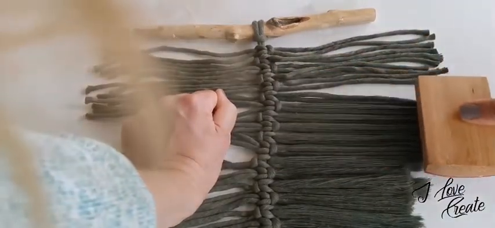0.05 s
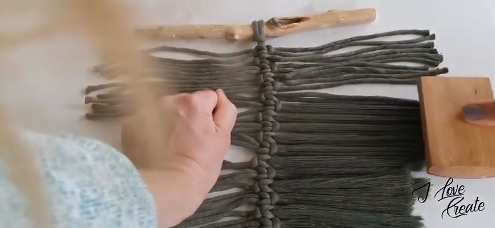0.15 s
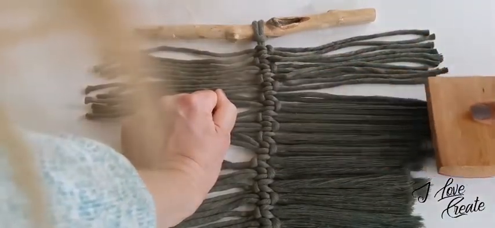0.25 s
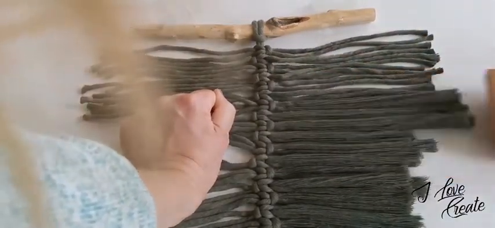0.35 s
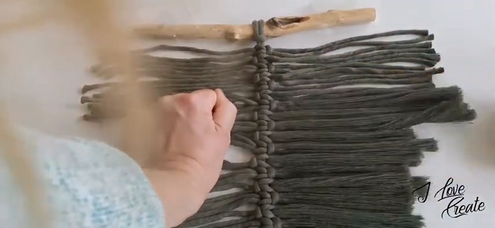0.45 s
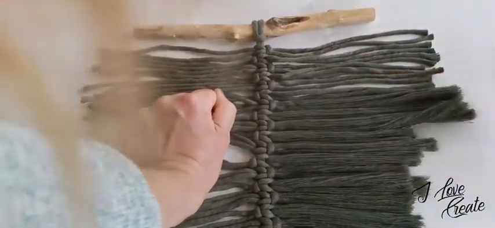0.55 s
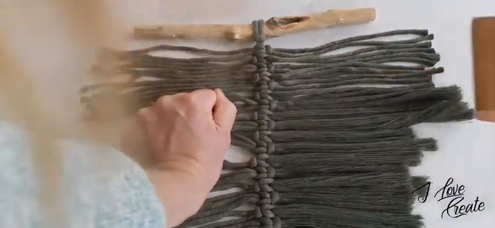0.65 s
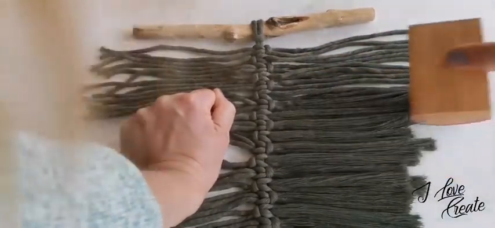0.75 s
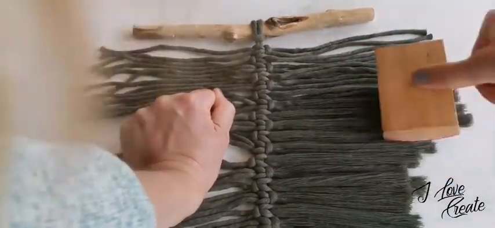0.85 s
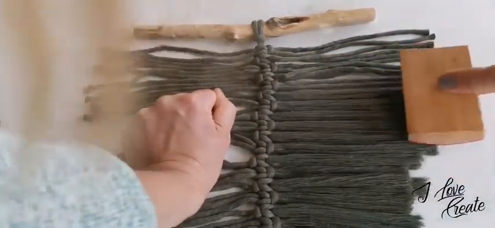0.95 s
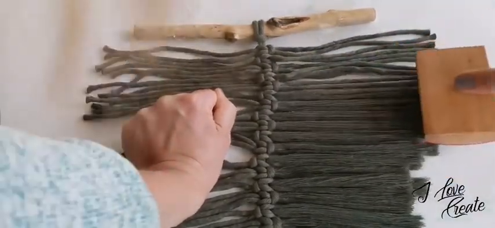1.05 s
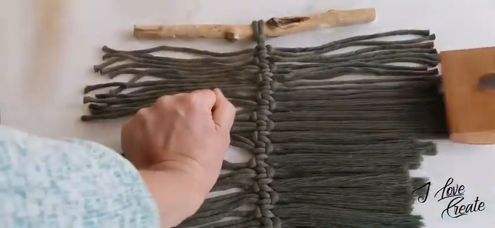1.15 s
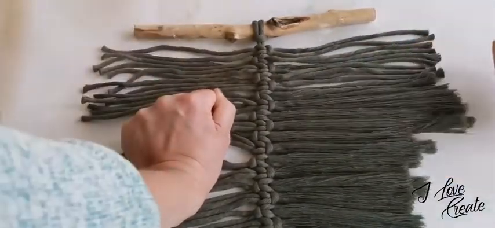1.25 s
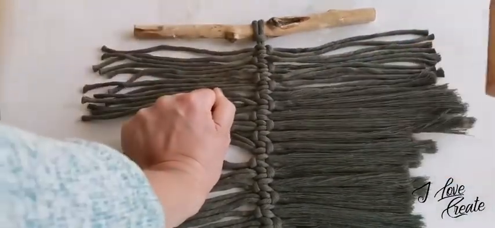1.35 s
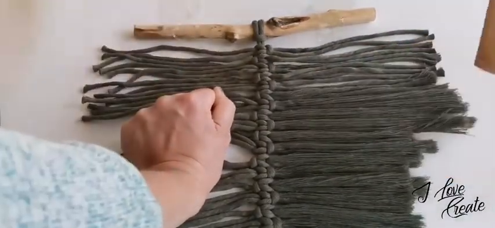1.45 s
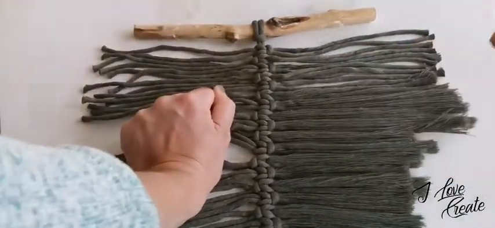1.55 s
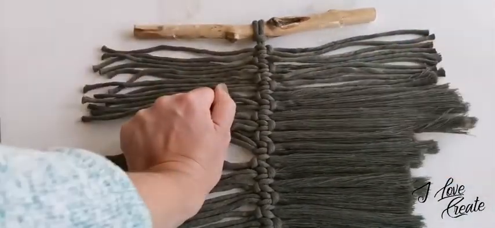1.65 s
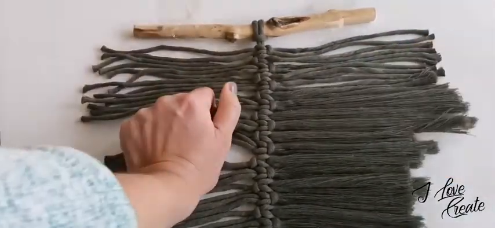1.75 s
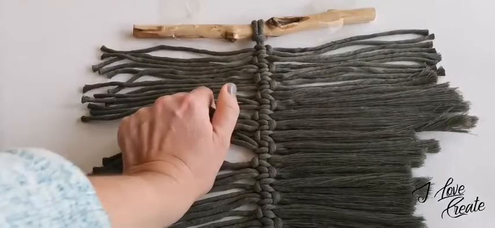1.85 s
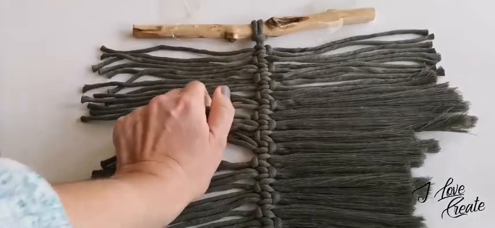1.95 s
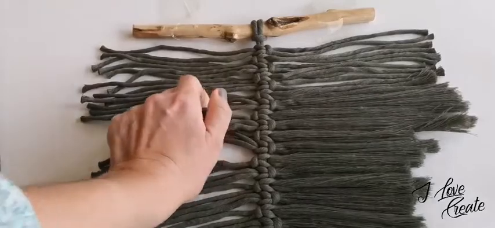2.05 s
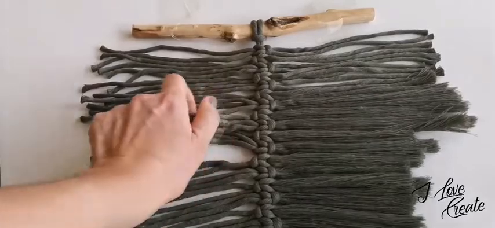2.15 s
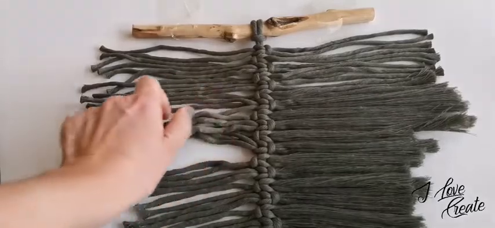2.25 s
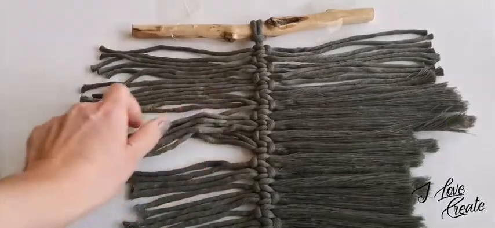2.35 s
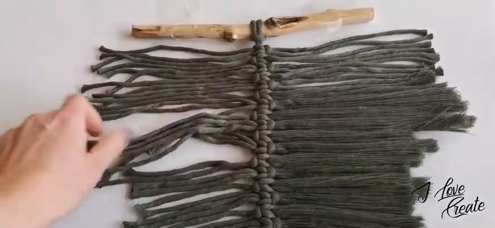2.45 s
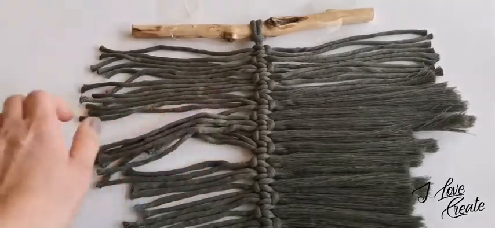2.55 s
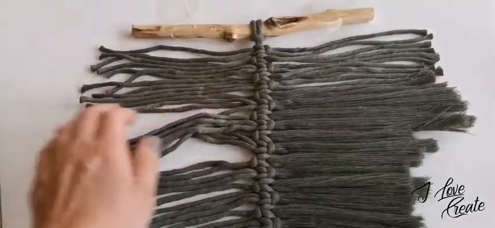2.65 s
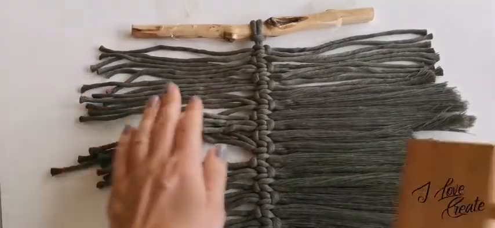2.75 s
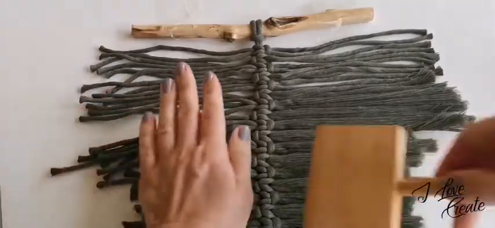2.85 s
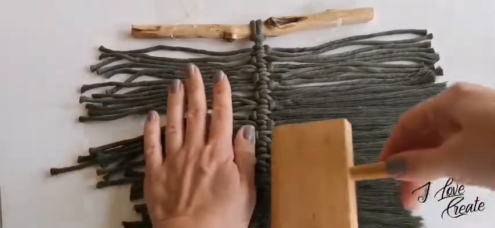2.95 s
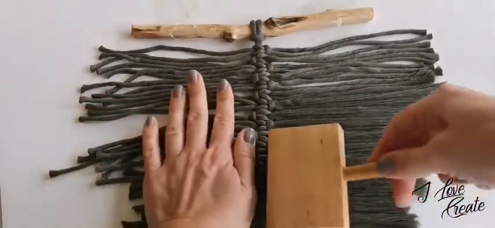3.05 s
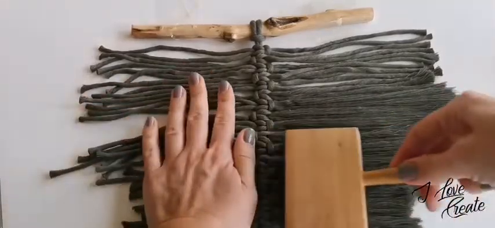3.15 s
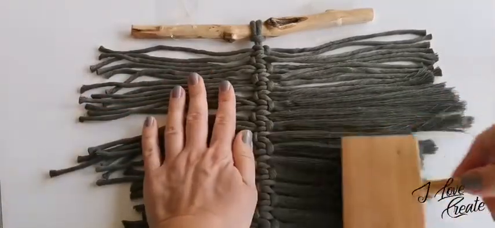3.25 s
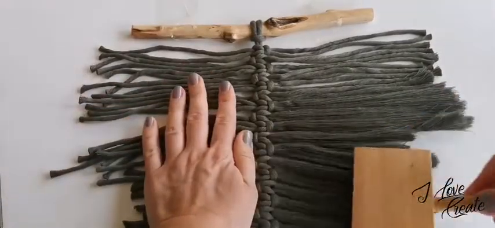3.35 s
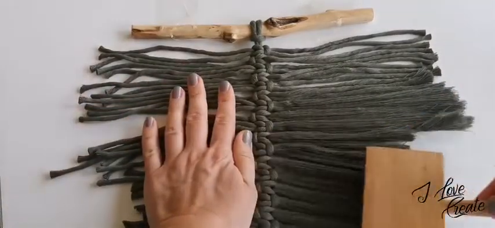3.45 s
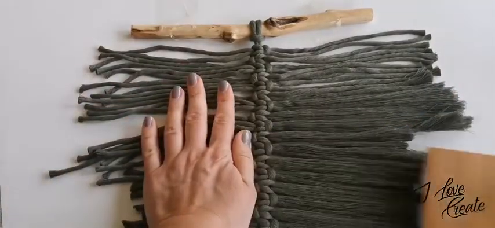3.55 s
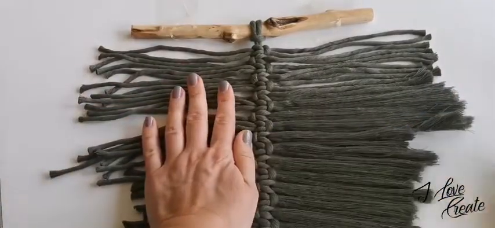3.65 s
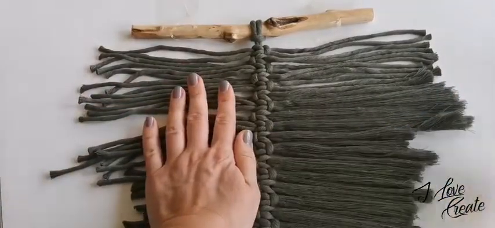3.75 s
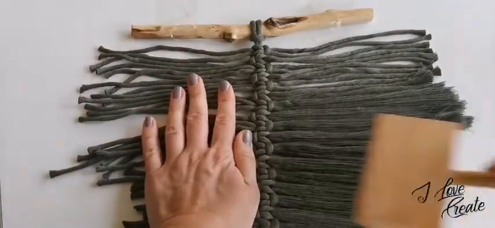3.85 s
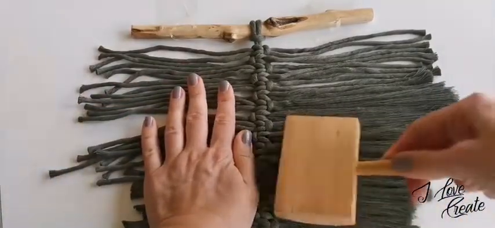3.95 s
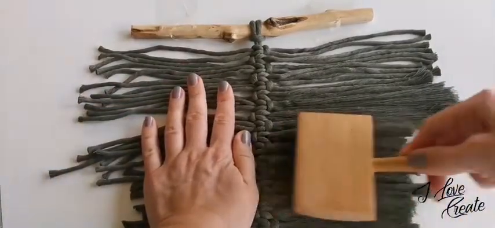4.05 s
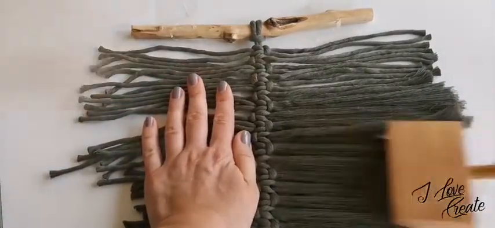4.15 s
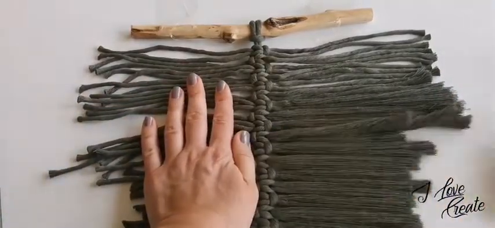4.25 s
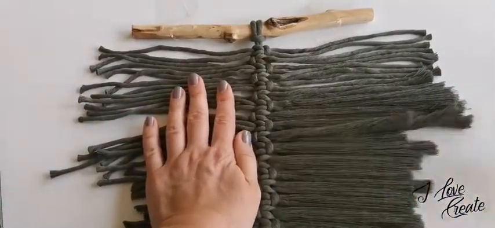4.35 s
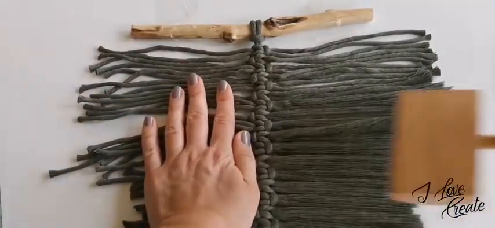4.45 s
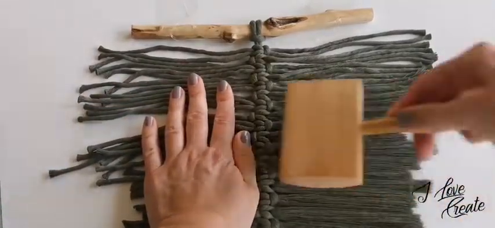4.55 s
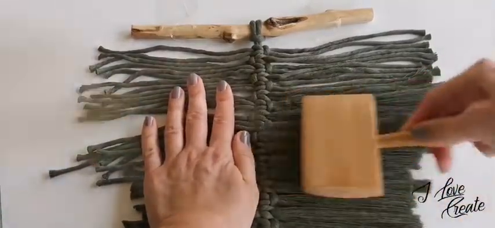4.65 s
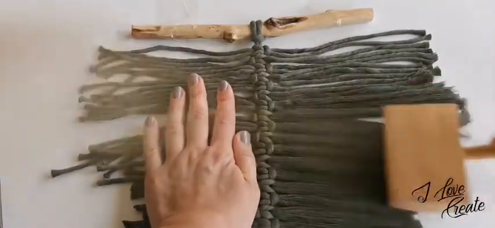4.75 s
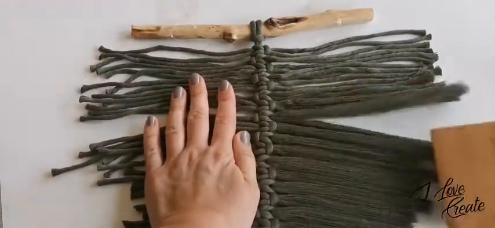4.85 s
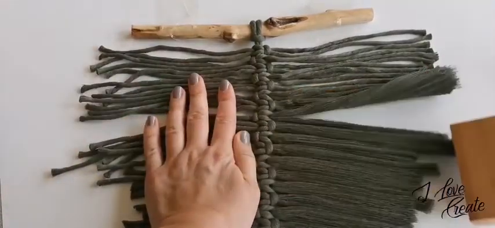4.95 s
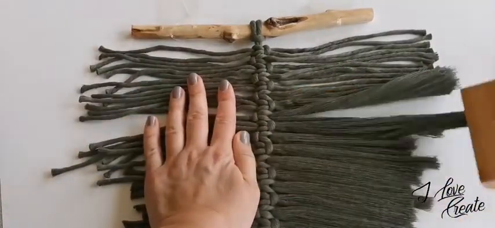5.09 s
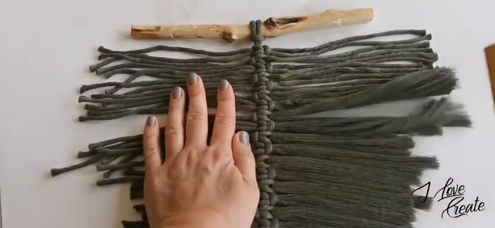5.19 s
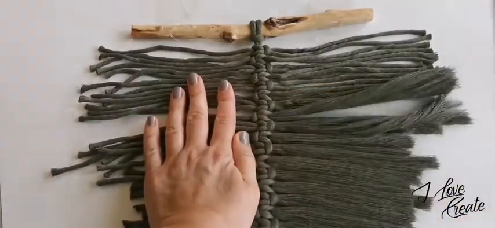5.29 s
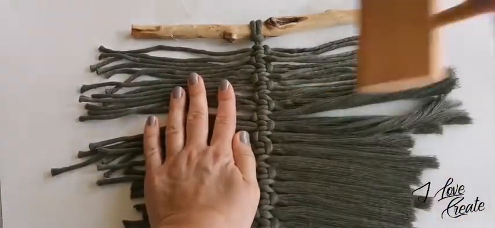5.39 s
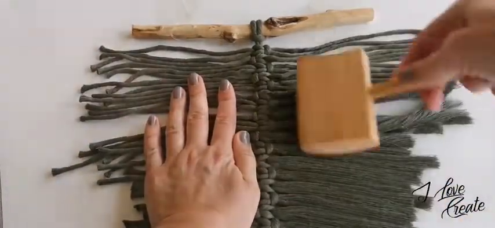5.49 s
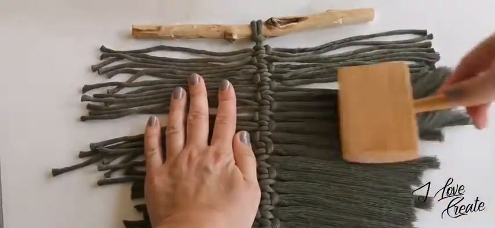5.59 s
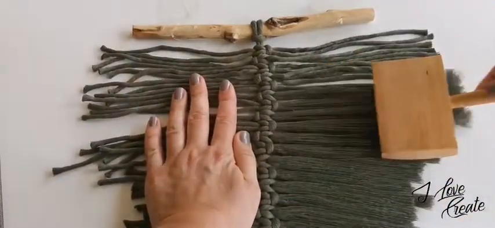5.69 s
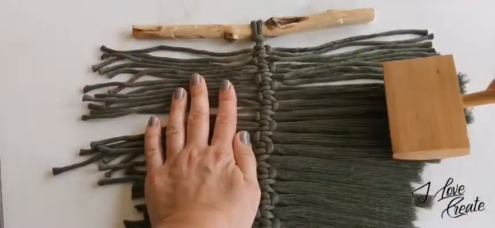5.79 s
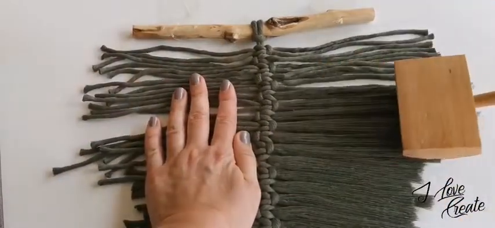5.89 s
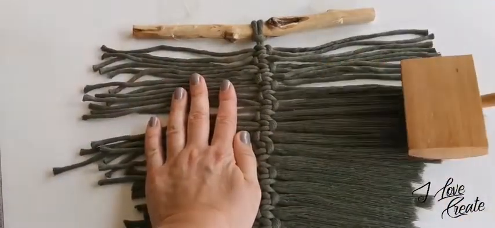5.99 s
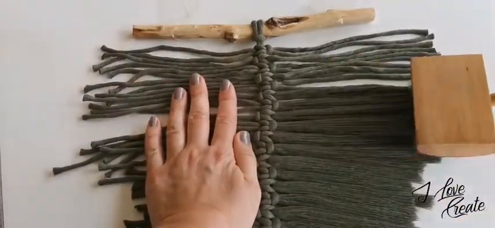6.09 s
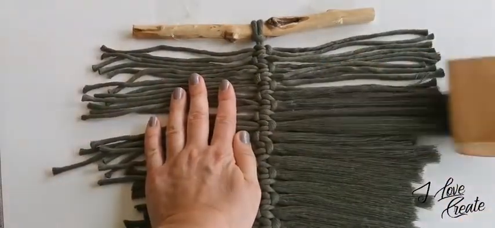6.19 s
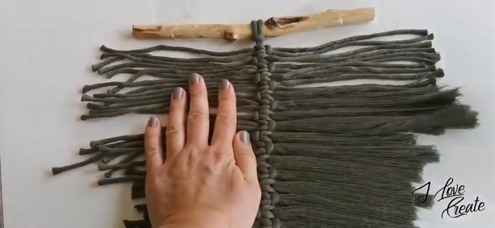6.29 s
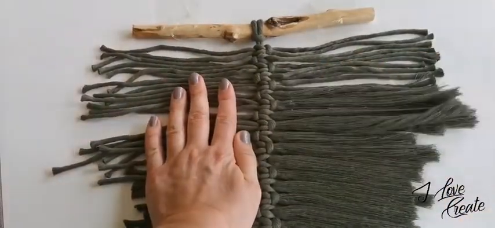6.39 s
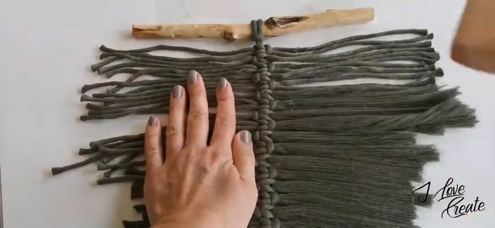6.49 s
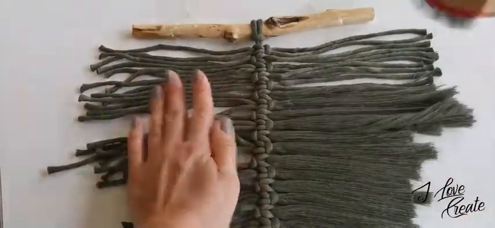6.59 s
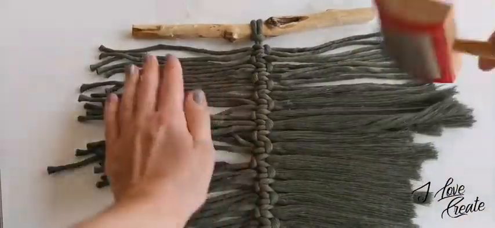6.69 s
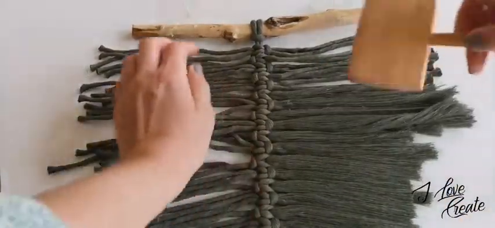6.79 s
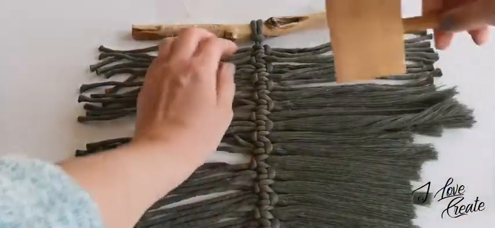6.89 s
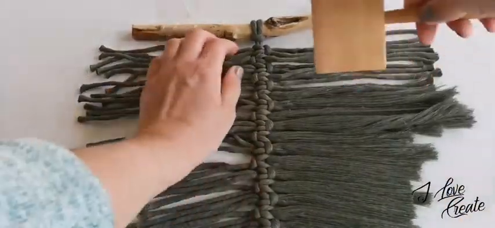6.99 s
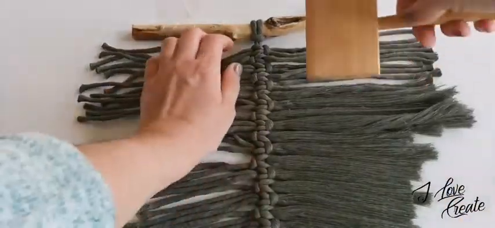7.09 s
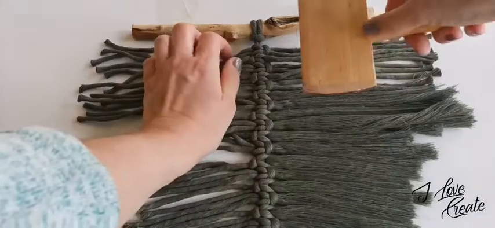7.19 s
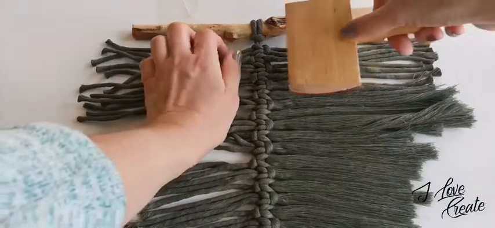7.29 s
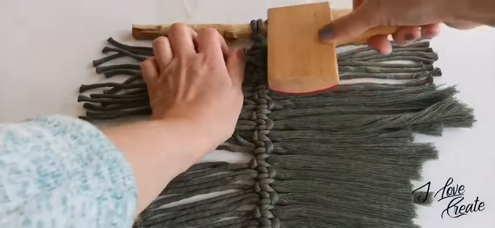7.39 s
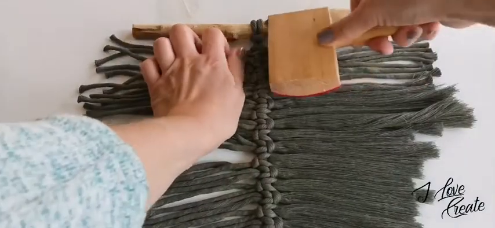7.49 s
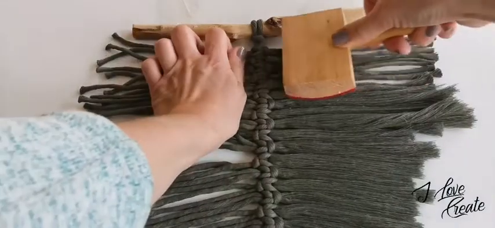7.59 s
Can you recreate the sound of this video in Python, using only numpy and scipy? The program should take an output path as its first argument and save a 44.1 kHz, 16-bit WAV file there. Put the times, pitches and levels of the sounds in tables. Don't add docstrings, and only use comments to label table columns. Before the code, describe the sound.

A wooden brush rakes through cotton cord fringe in dry scratchy strokes with pin ticks, a quiet pause between, and faint bird chirps far off.

```python
import sys
import numpy as np
from scipy import signal
from scipy.fft import rfft, irfft
from scipy.io import wavfile
from scipy.ndimage import uniform_filter1d, minimum_filter1d

SR = 44100
rng = np.random.default_rng(int(sys.argv[2]) if len(sys.argv) > 2 else 0)


def waveform_to_disk(signal):
    frames = np.transpose(np.atleast_2d(signal))
    scaled = np.clip(frames, -1, 1) * 32767
    samples = np.round(scaled).astype(np.int16)
    wavfile.write(sys.argv[1], SR, samples)


def ratio_of_db(decibels):
    return 10 ** (np.asarray(decibels, float) / 20)


N = 336483

# (touch [s], swell [s], fade [s], peak level [dB], touch level re peak [dB])
PULLS = [
    (3.4, 0.087, 0.11, -30.5, -9),
    (3.74, 0.13, 0.12, -25.5, -22),
    (4.314, 0.038, 0.14, -27, -0.5),
    (4.921, 0.044, 0.28, -27, -3),
    (5.84, 0.035, 0.11, -31, -10),
]
FLICKS = [
    (0.46, 0.12, 0.14, -27.5, -43.5),
    (1.195, 0.053, 0.19, -45.5, -3),
    (1.395, 0.055, 0.097, -32.5, -12.5),
    (6.479, 0.0047, 0.048, -31.5, -22),
]
GRAZES = [(1.15, 0.079, 0.017, -57, -22), (3.33, 0.065, 0.0093, -55.5, -37),
          (3.41, 0.055, 0.27, -50.5, -15), (3.74, 0.093, 0.074, -57, -2), (4.27, 0.049, 0.014, -54.5, -31),
          (4.87, 0.063, 0.011, -50.5, -19), (4.95, 0.11, 0.29, -57, -29), (5.78, 0.096, 0.05, -52, -10.5),
          (5.9, 0.029, 0.19, -54.5, -7), (6.69, 0.035, 0.076, -71, 3), (3.26, 0.032, 0.035, -74, -16),
          (.5, 0.036, .06, -50, -9)]
SURGES = [
    (0.575, 0.061, 0.033, -37.5, -18),
    (0.68, 0.026, 0.14, -57.5, -3),
    (3.57, 0.023, 0.24, -55.5, -8),
    (3.98, 0.1, 0.075, -52.5, -47),
    (4.4, 0.11, 0.075, -22.5, -20.5),
    (4.57, 0.088, 0.12, -49, -6),
    (5.13, 0.051, 0.036, -51, -31),
    (3.9, 0.048, .014, -35, -16),
]
CREEPS = [
    (0.07, 0.0065, 0.051, -58.5, -10),
    (0.25, 0.0095, 1, -72.5, 1),
    (6.1, 0.014, 0.2, -66.5, 22),
    (6.3, 0.04, 0.23, -64.5, -8),
    (6.4, 0.038, 0.065, -62, -6),
]
# (block at touch [dB], block at lift [dB], fizz at rest [dB], fizz at speed [dB],
# left-right at touch [dB], left-right at lift [dB], rubber pad [dB], pin tips [dB])
PULL_COLOUR = (-3, -15.5, -8.5, -0.5, 0.5, -2, -20, -21)
FLICK_COLOUR = (2, -19.5, 3.5, -0.5, -3.5, -2, -10, -12.5)
GRAZE_COLOUR = (6.5, 2, 5, -12.5, 0, -2, -2, -17)
SURGE_COLOUR = (2, -29.5, 14, -4, 5.5, -6.5, -45, -17)
CREEP_COLOUR = (-0.5, 9.5, 0, -8, -10, -3.5, -27, 0)
# (low bite [dB], high bite [dB], fizz [dB], top bite [dB])
PULL_TINT = [(1, 1.3, -1, 2.1), (5.5, -1.2, 0.071, 1), (3, 0.91, 0.6, 1.2), (0.8, -2.05, 0.052, -0.52),
             (-2.5, -1.8, 0.4, -.3)]
FLICK_TINT = [(2, -1.5, -2.5, -2), (-1, 0.5, 0.8, 1), (4, 3.5, -0.2, -5), (3.5, -2, 3, 3)]
GRAZE_TINT = [(-6, 1, 6, 10), (-5, -2, .3, 5), (9, -2, .3, -2), (11, .3, .3, 7), (-9, 1, .3, -16),
              (.3, .3, .3, -2), (-3, -8, 2, -3), (-4, -2, .3, -1), (.3, 6, -3, -2), (-4, .3, -5, -1),
              (-5, .3, .3, 4), (-1, -15, -9, -15)]
SURGE_TINT = [(-.3, .3, 3.1, .3), (-.3, .3, .3, .3), (.3, .3, .3, .3), (.3, .3, .3, .3),
              (.3, 0.18, .3, 0.24), (.3, .3, .3, .3), (.3, .3, .3, .3), (.3, .3, .3, .3)]
CREEP_TINT = [(13, .3, .3, .3), (9.5, .3, .3, .3), (3, 0.34, 3, 0.39), (-20, .3, 3.2, .3),
              (-16, .3, 2.8, .3)]
PULL_LAG_S = [-.00011, .00007, -.00004, -.00004, -.00004]
FLICK_LAG_S = [.00007, .00005, .00005, .00005]
# (frequency [Hz], density [dB per Hz])
SCRATCH_SPECTRUM = [(240, -19), (400, -4), (523, -22.5), (673, -19), (1050, -3), (1800, 2.5), (2380, 10),
                    (2980, 7), (3310, 2.5), (4870, -3.5), (6180, -10.5), (7950, -4.5), (12600, -15),
                    (13400, -37), (14000, -18.5)]
# (low [Hz], high [Hz])
PAD_HZ = (1603, 2185)
# (low [Hz], high [Hz])
TIPS_HZ = (6820, 8500)

# (time [s], peak level [dB], knock [Hz], tick level [dB])
SNAPS = [(0.004, -49, 1920, -39), (0.01, -45, 1500, -45), (0.015, -50, 2500, -47.5), (0.03, -49, 2000, -52),
         (0.061, -32.5, 1220, -33), (0.0712, -22.5, 2090, -27.5), (0.16, -50, 2110, -62),
         (0.19, -49, 1200, -45.5), (0.246, -35.5, 2150, -47), (0.254, -35, 1150, -34),
         (0.31, -57, 3000, -41.5), (0.352, -61, 2500, -53), (0.42, -33.5, 2060, -33),
         (0.458, -32, 1470, -30.5), (0.536, -29, 1700, -33), (0.621, -40, 2200, -15),
         (1.197, -56, 1930, -55), (1.273, -18.5, 1980, -20.5), (1.284, -24, 2200, -42),
         (1.306, -33, 2010, -28), (1.34, -31.5, 1120, -44), (1.395, -29.5, 2020, -53),
         (1.423, -25, 1910, -33), (1.447, -22.5, 1440, -32), (1.472, -25, 2100, -22),
         (3.401, -38, 1120, -48), (3.411, -33, 2400, -42), (3.487, -20.5, 1300, -33),
         (3.575, -24.5, 1540, -38), (3.603, -48, 1510, -63), (3.732, -21, 2060, -23),
         (3.742, -27, 1170, -51), (3.749, -29, 1200, -52), (3.757, -21, 2490, -46),
         (3.812, -14.5, 3200, -16), (3.838, -23, 2500, -21), (3.906, -37, 3080, -19),
         (4.273, -36.5, 910, -54), (4.3145, -23.5, 2860, -29), (4.318, -35, 2400, -41),
         (4.389, -19, 1040, -40), (4.393, -13.5, 1430, -47), (4.458, -28, 2200, -30),
         (4.902, -37, 1500, -51), (4.923, -30, 2130, -33), (5.797, -30.5, 1050, -54),
         (5.808, -37, 1500, -45), (5.848, -20.5, 1830, -23.5), (5.954, -28, 1510, -23),
         (6.481, -22, 1380, -17), (6.484, -30, 2200, -20), (6.688, -43, 1200, -60)]
PICKS = [(6.1, -32, 1650, -35.5), (6.106, -37.5, 1350, -43), (6.114, -52, 1500, -50.5),
         (6.123, -37, 1740, -34), (6.136, -32, 1220, -36.5), (6.143, -59, 1300, -45),
         (6.15, -52, 1500, -46), (6.165, -50, 1400, -46), (6.178, -54, 1700, -48), (6.192, -39, 1120, -38),
         (6.209, -35.5, 1890, -35), (6.266, -50, 1220, -55), (6.303, -38.5, 1120, -32),
         (6.329, -41, 1280, -55), (6.345, -41, 1120, -42), (6.396, -40, 1040, -54), (6.413, -28, 1350, -35),
         (6.426, -33, 1050, -31), (6.453, -43, 1030, -51)]
NAILS = [(1.076, -42.5, 880, -65), (1.696, -52, 4330, -40), (1.712, -59, 1510, -57), (1.724, -62, 796, -62),
         (1.912, -63, 920, -49), (1.986, -70, 1500, -60), (2.039, -56, 1490, -62), (2.12, -70, 2000, -60),
         (2.171, -54, 1450, -75), (2.262, -72, 1500, -52), (2.27, -66, 1510, -48), (2.391, -68, 2000, -59)]
# (knock [dB], tick [dB])
SNAP_PAN_DB = (-0.5, -5)
PICK_PAN_DB = (1, -15)
NAIL_PAN_DB = [13, -3, 14, 12, 18, 3, 5, 3, 3, 16, 16, -5]
# (frequency [Hz], level [dB], t60 [s])
BLOCK_MODES = [
    (1120, -21, 0.011),
    (1660, 1, 0.0012),
    (2210, -15.5, 0.017),
    (3120, -21, 0.011),
    (4300, -19.5, 0.011),
]

# (time [s], peak level [dB], frequency [Hz], t60 [s])
THUMPS = [(0.546, -54, 289, 0.97), (1.911, -49, 144, 0.15), (3.442, -42, 374, 0.42), (3.758, -50, 244, 0.5),
          (4.267, -37.5, 73, 0.36), (4.566, -45.5, 377, 0.96), (4.873, -40, 129, 0.54),
          (5.795, -31.5, 129, 0.81), (6.48, -39.5, 240, 1), (6.484, -45.5, 380, 1), (6.689, -55, 150, 0.73)]
# (time [s], peak level [dB])
BUMPS = [
    (1.7117, -26),
    (1.724, -33),
    (1.9116, -18),
    (2.039, -43),
]
# (loudest time [s], length [s], rub [dB], rustle [dB], rumble [dB])
DRAGS = [(0.097, 1, -60.5, -64.5, -67), (0.56, 0.11, -48, -49, -54), (0.79, 0.22, -54, -73, -61),
         (1.036, 0.27, -62, -76, -58), (1.382, 0.52, -52.5, -52, -83), (1.88, 0.15, -49.5, -75, -49),
         (2.372, 1, -55, -68, -66), (3.47, 0.33, -39.5, -68, -44), (3.78, 0.11, -39, -46, -35.5),
         (4.303, 0.24, -50, -59.5, -39), (4.54, 0.17, -57, -35, -49), (4.67, 0.44, -55.5, -65, -47.5),
         (4.898, 0.14, -49.5, -72, -37.5), (5.026, 0.2, -43.5, -30.5, -46.5), (5.69, 0.27, -55, -68.5, -56),
         (5.831, 0.22, -44.5, -53.5, -35.5), (6.024, 0.28, -68, -56.5, -55), (6.14, 0.12, -62, -54.5, -60),
         (6.39, 0.48, -58, -52, -53), (6.493, 0.19, -56, -60, -36), (6.716, 0.19, -42, -68, -41),
         (6.886, 0.15, -51.5, -72, -54), (7.37, 1, -58.5, -62.5, -73)]
# (rub [dB], rustle [dB], rumble [dB])
REST_DB = (-70.5, -73, -63)

# (start [s], length [s], pitch [Hz], level [dB], octave level [dB])
CHIRPS = [
    (2.193, 0.053, 2154, -52.5, -9),
    (2.386, 0.017, 2150, -61, -20),
    (5.553, 0.072, 2362, -43, -12.5),
    (5.572, 0.096, 1745, -59.5, -7.5),
    (6.837, 0.043, 2417, -42, -20),
    (6.884, 0.1, 2430, -58.5, -16),
    (2.254, 0.098, 2140, -64, -7),
    (5.625, .07, 2440, -56.5, -7),
]
FLUTTER = [0.323, 0.22, 0.28, 0.51, 0.25, 0.27, 0.22, 0.28]
CHIRP_TOPS = [0.66, .4, 0.57, 0.26, 0.68, .08, .08, .15]

# (frequency [Hz], density [dB per Hz])
AIR_SPECTRUM = [(12, -24), (20, -23.5), (60, -6.5), (98, -10.5), (144, -6.5), (270, -14), (468, -16),
                (687, -19.5), (809, -16), (1840, -26), (2230, -23), (4810, -29.5), (5360, -36.5),
                (11200, -36), (14000, -60)]
# (frequency [Hz], width [Hz], level [dB])
HUM = [
    (28, 11, -63),
    (146, 12, -63),
    (240, 20, -71),
]
# (frequency [Hz], correlation [1])
LIKENESS = [(60, 0.12), (150, 0.4), (370, 0.11), (900, -0.22), (2230, -0.16), (5510, -0.14), (13600, -0.61)]
# (frequency [Hz], t60 [s])
ROOM_T60 = [(150, 1), (600, 0.37), (2000, 0.4), (5000, 0.41), (12000, 0.3)]
# (frequency [Hz], left-right [dB])
PORT_BALANCE = [(700, 0.5), (1700, -1.5), (2400, -1.5), (3200, -1), (5500, -2), (7000, -9.5), (8300, -16),
                (9500, 12), (10400, 12.5), (12000, 14.5)]
# (frequency [Hz], level [dB])
CAPSULE = [(6300, -1.5), (7700, -5.5), (8400, -8), (8700, -4), (9200, -4)]


def brush_grain():
    colour = ratio_of_db(read(SCRATCH_SPECTRUM, np.fft.rfftfreq(2048, 1 / SR)))
    catch = ratio_of_db(0.16 * evened(band(rng.standard_normal(N), 32, 150)))
    both, left, right = (slips(9000, 4.2) * catch for _ in range(3))
    grain = np.array([shaped(both + 3.15 * band(own, 4470, 20600), colour, 2048) for own in (left, right)])
    grain = patchy(grain, 3.04, 3, 5)
    return patchy(grain, 0.8, 2, 16)


def strokes():
    swell_limit, firm_db = 0.27, -42
    speed_up_s, lift_fizz_db = 0.038, 9
    fade_db, fade_curve, trail_db_per_s = -31, 1.71, -250
    grain = brush_grain()
    block, mids, fizz = (evened(band(grain, *edge)) for edge in [(450, 1500), (1500, 5500), (5500, 16000)])
    bite = band(mids, 800, 2900)
    pad, tips = evened(band(grain, *PAD_HZ)), evened(band(grain, *TIPS_HZ))
    out = np.zeros((2, N))
    kinds = [(FLICKS, FLICK_COLOUR, FLICK_TINT, FLICK_LAG_S), (PULLS, PULL_COLOUR, PULL_TINT, PULL_LAG_S),
             (GRAZES, GRAZE_COLOUR, GRAZE_TINT, 0), (SURGES, SURGE_COLOUR, SURGE_TINT, 0),
             (CREEPS, CREEP_COLOUR, CREEP_TINT, 0)]
    for rows, colour, tints, lags in kinds:
        block_0, block_1, fizz_0, fizz_1, pan_0, pan_1, pad_db, tips_db = colour
        for row, tint, lag_s in zip(rows, tints, lags * np.ones(len(rows))):
            touch, swell, fade, peak_db, touch_db = row
            low_db, high_db, fizz_tint_db, top_db = tint
            at = round(touch * SR) + np.arange(round((swell + fade + 0.1) * SR))
            t = (at - at[0]) / SR
            db = peak_db + touch_db * np.maximum(1 - t / swell, 0) ** 2
            db += fade_db * np.clip((t - swell) / fade, 0, 1) ** fade_curve
            db += trail_db_per_s * np.maximum(t - swell - fade, 0)
            along = np.minimum(t / (swell + fade), 1)
            speed = 1 - np.exp(-t / speed_up_s)
            block_db = block_0 + (block_1 - block_0) * along - swell_limit * (peak_db - firm_db)
            fizz_db = fizz_0 + (fizz_1 - fizz_0) * speed + lift_fizz_db * along ** 2
            pan_db = pan_0 + (pan_1 - pan_0) * along
            sound = ratio_of_db(block_db) * block[:, at] + ratio_of_db(fizz_db + fizz_tint_db) * fizz[:, at]
            sound -= ratio_of_db(low_db) * bite[:, at]
            sound += ratio_of_db(high_db) * band(mids[:, at], 2900, 4100)
            sound -= ratio_of_db(top_db) * band(mids[:, at], 4100, 9000)
            sound += ratio_of_db(tips_db) * tips[:, at] - ratio_of_db(pad_db) * pad[:, at]
            sound[0] = np.roll(sound[0], round(lag_s * SR))
            level = ratio_of_db(db - 3.0 + np.outer([0.5, -0.5], pan_db))
            out[:, at] += level * sound * np.minimum(t / 0.0011, 1)
    return out


def snaps():
    out, t = np.zeros((2, N)), np.arange(2400) / SR
    rise = 1 - np.exp(-t / 0.00079)
    impact = band((1 - t / 0.000096) * np.exp(-t / 0.00057), 864, 7000)
    # (clicks, pans [dB], tick low [Hz], tick high [Hz], ring t60 [s], block [dB], bare tick [1])
    kinds = [(SNAPS, [SNAP_PAN_DB] * len(SNAPS), 2700, 8800, 0.0095, 0.3, 3.3),
             (PICKS, [PICK_PAN_DB] * len(PICKS), 2600, 9000, 0.011, -1.2, 4.5),
             (NAILS, zip(NAIL_PAN_DB, NAIL_PAN_DB), 2600, 14000, 0.016, -12.0, 5.0)]
    for rows, pans, low_hz, top_hz, ring_s, block_db, bare in kinds:
        for (s, db, hz, tick_db), (pan_db, tick_pan_db) in zip(rows, pans):
            puff = rng.standard_normal(2400)
            knock = np.sin(2 * np.pi * hz * t) * ratio_of_db(-60 * t / ring_s)
            for mode_hz, mode_db, t60 in BLOCK_MODES:
                knock += np.sin(2 * np.pi * mode_hz * t) * ratio_of_db(block_db + mode_db - 60 * t / t60)
            knock += ratio_of_db(-16.0 - 60 * t / 0.015) * evened(band(puff, 660, 2100))
            knock += ratio_of_db(block_db) * 1.02 * impact
            scatter = puff * (ratio_of_db(-60 * t / 0.0072) + ratio_of_db(-46.0 - 60 * t / 0.042))
            tick = band(bare * (abs(t - 0.0006) < 0.5 / SR) + scatter, low_hz, top_hz)
            add(out, s - 0.0005, rise * ratio_of_db(db + 1.5) * band(knock, 580, 11000), pan_db)
            add(out, s - 0.0005, rise * ratio_of_db(tick_db + 2.5) * tick / abs(tick).max(), tick_pan_db)
    return out


def thumps():
    landing_s = 0.003
    out, t = np.zeros((2, N)), np.arange(SR // 4) / SR
    push = 0.36 * (1 - t / 0.0014) * np.exp(-t / 0.0017)
    for s, db, hz, t60 in THUMPS:
        ring = np.sin(2 * np.pi * hz * t) * ratio_of_db(-60 * t / (0.19 * t60))
        overtone = 0.45 * np.sin(2 * np.pi * 1.84 * hz * t) * ratio_of_db(-60 * t / 0.069)
        add(out, s + landing_s, ratio_of_db(db + 5.0) * (ring + overtone + push) * (1 - np.exp(-t / 0.00083)))
    return out


def bumps():
    out, t = np.zeros((2, N)), np.arange(600) / SR
    for s, db in BUMPS:
        rattle = rng.standard_normal(600)
        push = -np.exp(-t / 0.0005) * (1 + 0.22 * rattle) * (1 - np.exp(-t / 0.00006))
        add(out, s, ratio_of_db(db - 15) * band(push, 120, 14000), 30)
    return out


def shuffle():
    lead, edge_db, curve = 0.27, -14.5, 1.52
    t, level = np.arange(N) / SR, ratio_of_db(REST_DB)[:, None] * np.ones(N)
    for s, length, *peak_db in DRAGS:
        away = np.maximum((s - t) / lead, (t - s) / (1 - lead)) / length
        level = np.maximum(level, np.outer(ratio_of_db(peak_db), ratio_of_db(edge_db * away ** curve)))
    noise = rng.standard_normal((2, N))
    table = resonate(noise[0], 515, 47) + 2.1 * resonate(noise[0], 467.0, 64)
    rub = evened(table + 0.08 * band(noise[0], 140, 2110))
    fibres = np.array([slips(5000, 4.2) for _ in range(2)])
    rustle = evened(band(fibres, 6540, 9050) + 0.87 * band(fibres, 3240, 5400))
    rumble = evened(band(noise[1], 43, 352))
    return rub * level[0] * ratio_of_db(-2.5) + rustle * level[1] * ratio_of_db(-0.5) + rumble * level[2] * ratio_of_db(-9.0)


def chirps():
    scoop, scoop_s, edge_db = 0.077, 0.0086, -8.5
    out = np.zeros((2, N))
    for (s, length, top_hz, top_db, octave_db), flutter, top in zip(CHIRPS, FLUTTER, CHIRP_TOPS):
        t = np.arange(0, length, 1 / SR)
        hz = top_hz * (1 - scoop * np.exp(-t / scoop_s))
        hz = hz * (1 + flutter * uniform_filter1d(rng.standard_normal(len(t)), 120))
        db = top_db + edge_db * abs(t / length - top) / 0.7
        phase = 2 * np.pi * np.cumsum(hz) / SR
        octave = ratio_of_db(octave_db) * np.minimum(t / 0.016, 1) ** 2 * np.sin(2 * phase)
        add(out, s, ratio_of_db(db) * (np.sin(phase) + octave) * signal.windows.tukey(len(t), 0.2))
    return out


def air():
    colour = ratio_of_db(read(AIR_SPECTRUM, np.fft.rfftfreq(4096, 1 / SR)))
    noise = rng.standard_normal((3, N))
    tone = patchy(diffuse(*(shaped(n, colour, 4096) for n in noise[:2])), 1.57, 4, 25)
    drone = sum(ratio_of_db(db) * evened(resonate(noise[2], hz, width)) for hz, width, db in HUM)
    return ratio_of_db(-60.5 + 2.5) * tone + drone


def room(x):
    out, turn = np.zeros((2, N)), 2 * np.pi * 3.1 * np.arange(N) / SR
    for k in range(3):
        taps = np.zeros((2, SR // 2))
        at = np.arange(130, SR // 2 - 20, 20) + rng.integers(0, 20, (2, (SR // 2 - 131) // 20))
        np.put_along_axis(taps, at, rng.choice([-1.0, 1.0], at.shape), 1)
        hz, t, z = signal.stft(taps, SR, nperseg=256)
        decay = ratio_of_db(-60 * t / read(ROOM_T60, hz)[:, None])
        tail = diffuse(*signal.istft(z * decay, SR, nperseg=256)[1])
        share = np.sqrt((1 + np.cos(turn + 2 * np.pi * k / 3)) / 3)
        out += signal.fftconvolve((x * share)[None], tail / np.linalg.norm(tail[0]), axes=1)[:, :N]
    return out


def evened(x):
    return x / np.sqrt(np.mean(x ** 2) + 1e-20)


def read(points, hz):
    f, value = np.transpose(points)
    return np.interp(np.log(hz + 1), np.log(f + 1), value)


def add(mix, s, sound, pan_db=0):
    part = mix[:, round(s * SR):][:, :len(sound)]
    part += ratio_of_db([[pan_db / 2], [-pan_db / 2]]) * sound[:part.shape[1]]


def shaped(x, gain, count):
    log = np.log(np.maximum(abs(gain), 1e-5))
    full = np.r_[log, log[-2:0:-1]]
    taps = np.fft.ifft(np.exp(np.conj(signal.hilbert(full)))).real[:count // 2]
    return signal.oaconvolve(x, taps)[:len(x)]


def band(x, lo_hz, hi_hz):
    return signal.sosfilt(signal.butter(3, [lo_hz, hi_hz], "band", fs=SR, output="sos"), x)


def resonate(x, hz, width_hz):
    turn = np.exp(2j * np.pi * np.cumsum(hz * np.ones(len(x))) / SR)
    r = np.exp(-np.pi * width_hz / SR)
    return 2 * (turn * signal.lfilter([1 - r], [1, -r], x / turn + 1e-18)).real


def diffuse(a, b):
    same = np.clip(read(LIKENESS, np.fft.rfftfreq(len(a), 1 / SR)), -1, 1)
    return np.array([a, irfft(same * rfft(a) + np.sqrt(1 - same ** 2) * rfft(b), len(a))])


def slips(per_s, spread_db):
    size = ratio_of_db(spread_db * np.minimum(rng.exponential(1, N), 4.2))
    return evened(size * rng.choice([-1.0, 1.0], N) * (rng.random(N) < per_s / SR))


def patchy(x, patch_db, bins, frames):
    z = signal.stft(x, nperseg=256)[2]
    field = uniform_filter1d(uniform_filter1d(rng.standard_normal(z.shape[1:]), bins, 0), frames, 1)
    return evened(signal.istft(z * ratio_of_db(patch_db * evened(field)), nperseg=256)[1][:, :N])


def levelled(x):
    power_db = 10 * np.log10(abs(uniform_filter1d((x ** 2).mean(0), 900)) + 1e-12)
    fall_db = np.arange(N) * 39.0 / SR
    over_db = np.maximum(np.maximum.accumulate(power_db + fall_db) - fall_db + 40.0, 0)
    return x / ratio_of_db(0.22 * uniform_filter1d(over_db, 900))


def thinned(x):
    hz, t, z = signal.stft(x, SR, "cosine", nperseg=2048, noverlap=1024)
    which = (hz // 345).astype(int)
    starts = np.searchsorted(which, np.arange(which[-1] + 1))
    power = np.add.reduceat((abs(z) ** 2).sum(0), starts, 0) + 1e-16
    steps, frame_db = np.arange(len(power)), 10 * np.log10(power[3:].sum(0))
    masker = ratio_of_db(-3.2 * abs(steps[:, None] - steps)) @ power
    luck = evened(uniform_filter1d(rng.standard_normal(power.shape), size=2, axis=1))
    kept = (6 * np.log10(power / masker) + 4.5 * luck > -11.7) | (steps < 5)[:, None]

    blocks = band(x[1], 1000, 9000)[:N // 1024 * 1024].reshape(-1, 1024)
    crest_db = 20 * np.log10(abs(blocks).max(1) / blocks.std(1))
    crest_db = -minimum_filter1d(-crest_db, size=2, origin=0)
    clicky = np.interp(t, np.arange(len(blocks)) * 1024 / SR, crest_db) > 14.5
    weak = (10 * np.log10(power) - frame_db + 2.5 * luck < -21.5) & (frame_db < -43.5)
    kept = kept[which] & ~(clicky & weak[which] & (hz[:, None] > 9200 + 700 * luck[1]))

    near_click = uniform_filter1d(1.0 * clicky, size=3, origin=0)
    sink_hz = (3200 + 1200 * luck[2]) * near_click * np.clip((-41.0 - frame_db) / 4.0, 0, 1)
    kept &= hz[:, None] < 13900 + 19.0 * frame_db + 150 * luck[0] - sink_hz
    y = signal.istft(z * kept, SR, "cosine", nperseg=2048, noverlap=1024)[1][:, :N]

    hz, short_t, z = signal.stft(y, SR, "cosine", nperseg=256, noverlap=128)
    cell_db = 10 * np.log10(uniform_filter1d((abs(z) ** 2).sum(0), size=3, axis=0) + 1e-16)
    under_db = cell_db + minimum_filter1d(-cell_db, size=11, axis=1, origin=4)
    under_db += 3 * rng.standard_normal(cell_db.shape)
    lost = (under_db < -16) & (np.interp(short_t, t, 1.0 * clicky) > 0.5) & (hz[:, None] > 1800)
    return signal.istft(z * ~lost, SR, "cosine", nperseg=256, noverlap=128)[1][:, :N]


def scene():
    left_lag_s = 0.00012
    brush, pins, bird = strokes(), snaps(), chirps()
    near, hz = brush + pins, np.fft.rfftfreq(N, 1 / SR)
    late = irfft(rfft(near[0]) * np.exp(-2j * np.pi * hz * left_lag_s), N)
    direct = ratio_of_db(4.5) * np.array([late, near[1]])
    wet = room(ratio_of_db(0.5) * brush.mean(0) + ratio_of_db(2.5) * pins.mean(0) + ratio_of_db(1.5) * bird[0])
    return direct + wet + ratio_of_db(1.5) * bird + thumps() + bumps() + shuffle() + air()


def band_limit(x):
    return signal.sosfilt(signal.butter(12, 14200, fs=SR, output="sos"), x)


def record(dry):
    hz = np.fft.rfftfreq(512, 1 / SR)
    tilt_db, colour_db = read(PORT_BALANCE, hz) / 2, read(CAPSULE, hz)
    left = shaped(dry[0], ratio_of_db(colour_db + tilt_db), 512)
    right = shaped(dry[1], ratio_of_db(colour_db - tilt_db), 512)
    mix = thinned(levelled(np.array([left, right])))
    return band_limit(mix)


dry = scene()
out = record(dry)
waveform_to_disk(out)
```